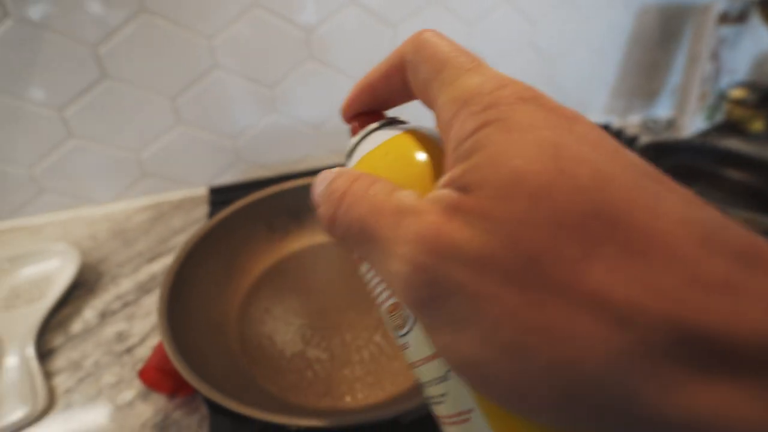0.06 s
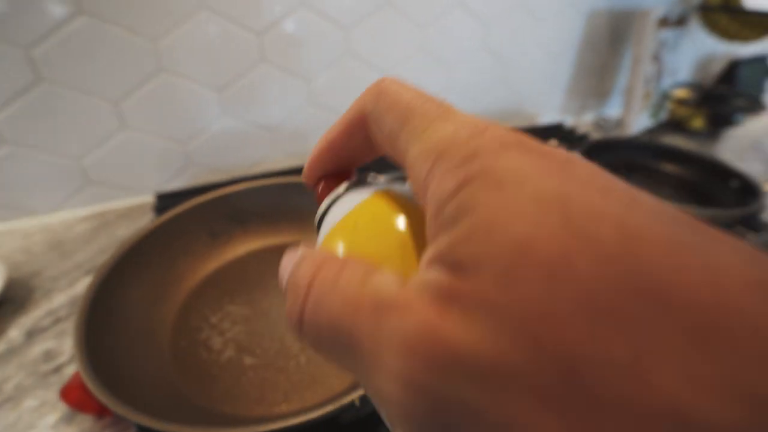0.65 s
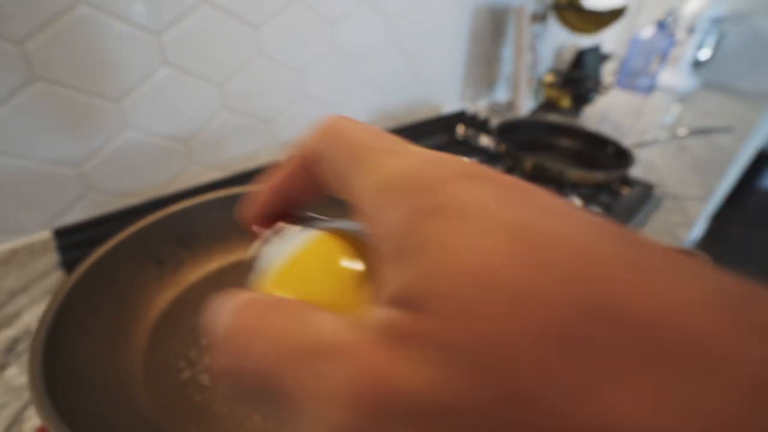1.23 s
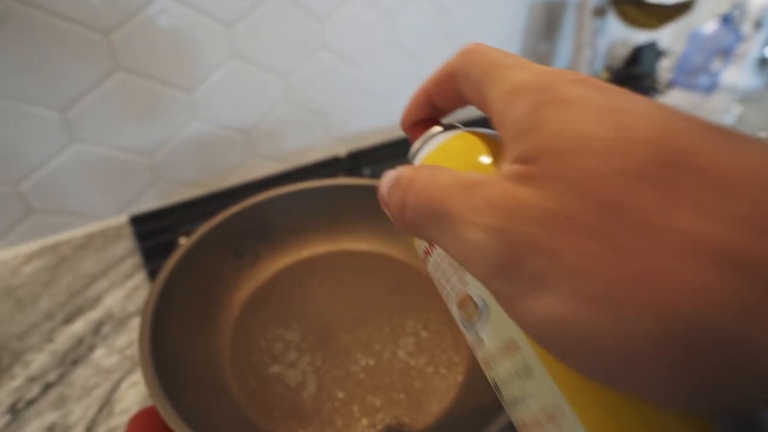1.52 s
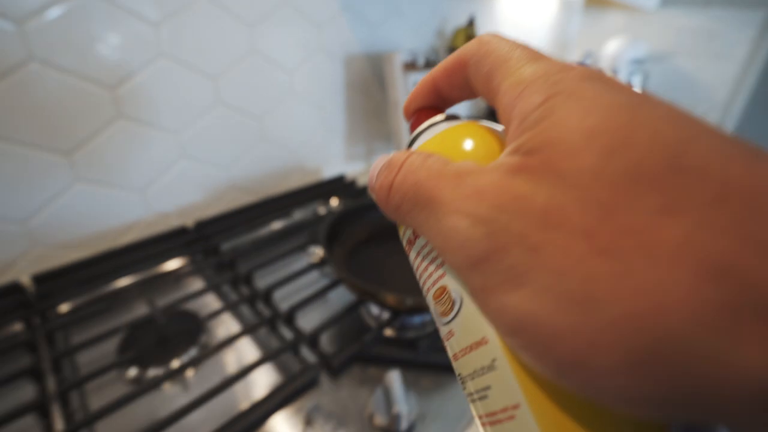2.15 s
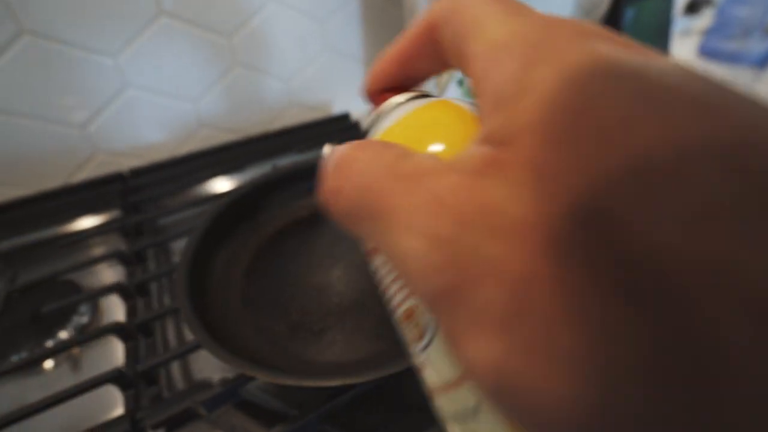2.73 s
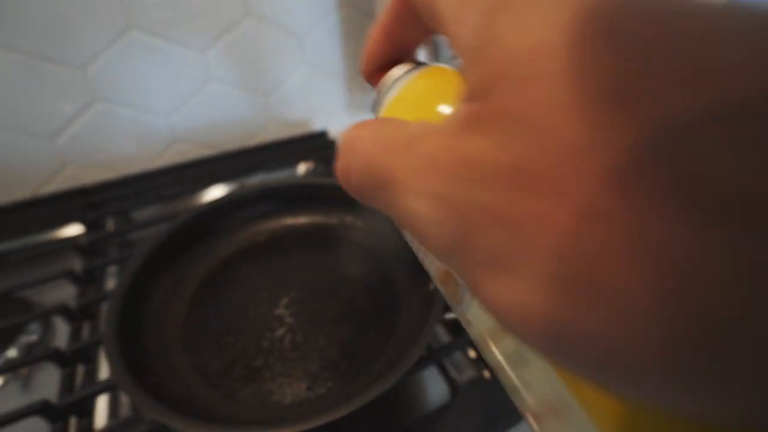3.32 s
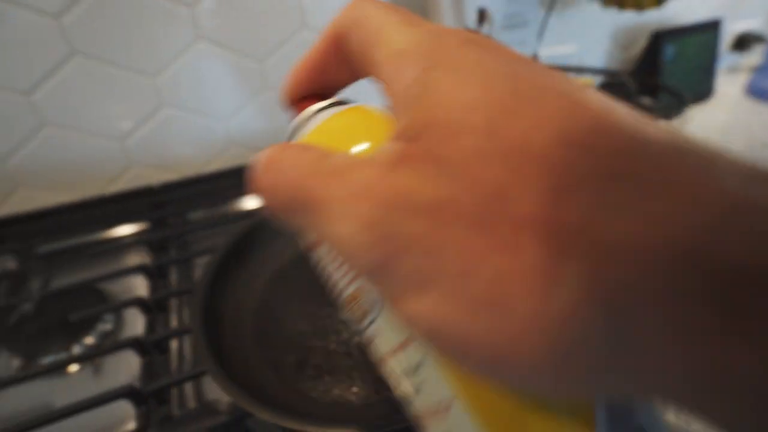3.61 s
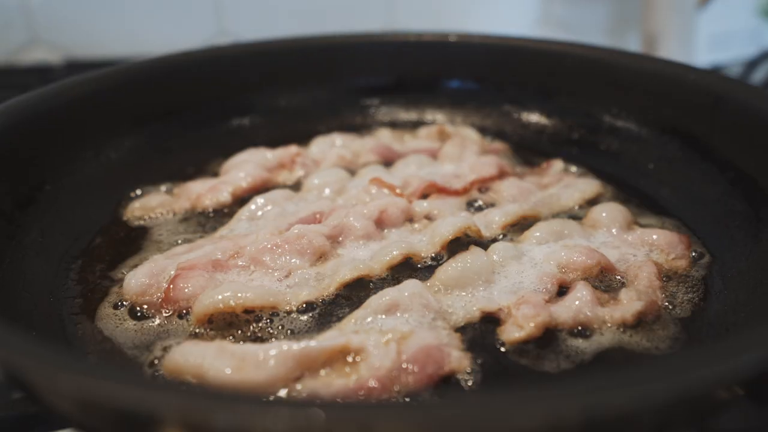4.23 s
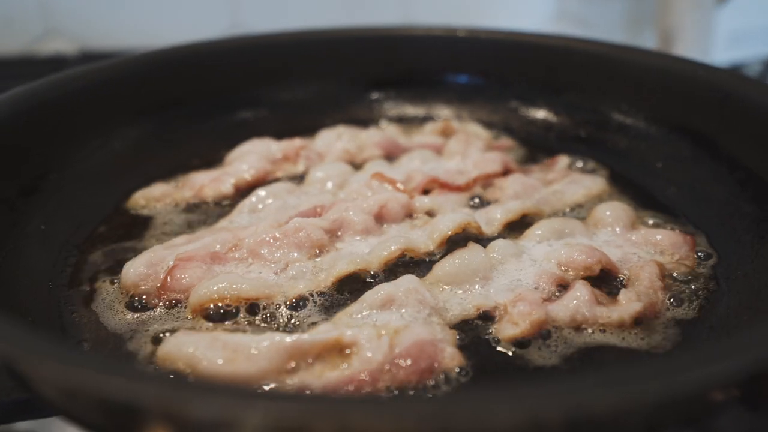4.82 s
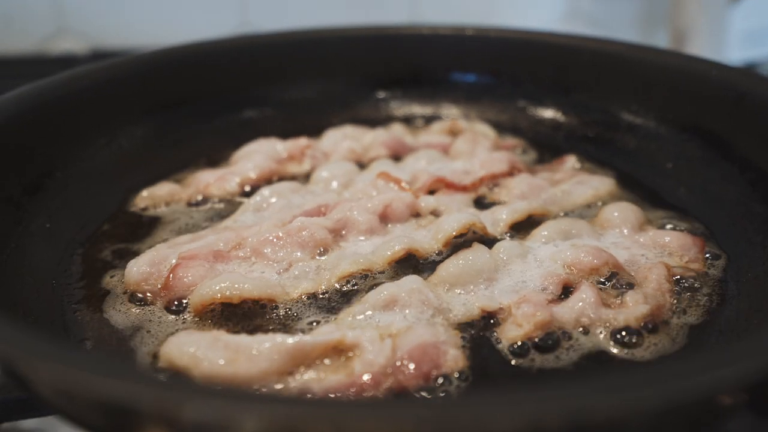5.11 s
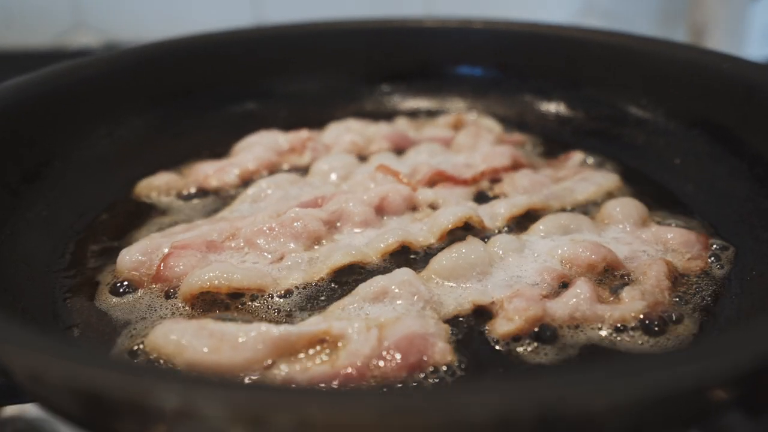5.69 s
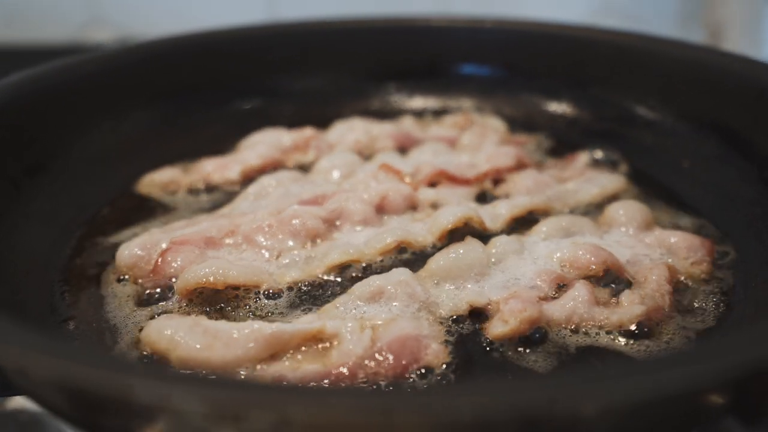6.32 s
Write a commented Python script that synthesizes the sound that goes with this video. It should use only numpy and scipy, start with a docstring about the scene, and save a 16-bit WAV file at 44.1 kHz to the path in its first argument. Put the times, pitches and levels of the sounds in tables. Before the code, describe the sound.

Two long hisses of aerosol cooking spray with a short pause between, followed abruptly by bacon crackling and spitting in hot fat.

```python
"""Cooking spray hisses into a frying pan on a gas stove, the nozzle whistling briefly; the circling can
shifts the pan's echoes. In the pause the burner hisses softly and the can ticks in the hand.
A second long burst follows, and a bump shakes the microphone mount. Then, abruptly, bacon fries
close up: dense bursting bubbles of fat, sharp pops, a few duller plops and spits of steam."""
import sys
import numpy as np
from scipy import signal
from scipy.fft import rfft, irfft, next_fast_len
from scipy.io import wavfile
from scipy.ndimage import map_coordinates

SR = 44100
rng = np.random.default_rng(int(sys.argv[2]) if len(sys.argv) > 2 else 0)


def inscribe(sig):
    """Save sig as 16-bit PCM at rate SR to the path in sys.argv[1].

    A 1-D sig is mono; a 2-D sig holds one channel per row.
    Samples are clipped to [-1, 1] before scaling.
    """
    pcm = np.round(np.clip(np.atleast_2d(sig).T, -1, 1) * 32767)
    wavfile.write(sys.argv[1], SR, pcm.astype(np.int16))


N = 280476
FRY_START_S = 4.06  # hard cut from spray to bacon
TOP_HZ = 15850


def spray():
    """The jet hisses while the valve is open and fizzles out after; the hand circles over the pan."""
    # nozzle presses: (opens [s], shuts [s], pan echo delay [ms], its swing [ms], hand circles [1/s]); the
    # second is still spraying when the scene changes at 4.06 s
    presses = [(-0.02, 1.473, 2.07, 0.057, 0.955), (2.446, 4.06, 1.89, 0.13, 1.75)]
    # tone of the jet, one spectrum a press: (frequency [Hz], density [dB])
    spectra = [
        [(35, -54), (60, -34.5), (87, -12), (206, -14), (299, -8.5), (588, -15.5), (834, -10.5), (1010, -16.5),
         (1210, -12), (2320, -14), (3620, -3), (5010, -11), (7990, -3), (12400, -0.5), (15700, -2.5)],
        [(35, -53), (60, -20), (142, -10.5), (243, -14.5), (306, -11), (661, -12), (725, -20), (854, -11),
         (2740, -13.5), (3000, -5.5), (3790, -3), (4790, -10.5), (8770, 0), (14000, 5.5), (15700, 2)],
    ]
    # hiss as the aim shifts, one curve a press: (time [s], body level [dB], top octave level [dB])
    levels = [
        [(0.02, -30.5, -27.5), (0.38, -32.5, -29.5), (0.504, -32.5, -26.5), (0.998, -32.5, -30.5),
         (1.102, -30.5, -30.5), (1.154, -33, -32), (1.21, -32, -27), (1.286, -32, -31.5), (1.46, -30.5, -30)],
        [(2.48, -31.5, -36), (2.544, -31, -31), (2.766, -30.5, -26.5), (2.948, -31.5, -29), (3.188, -30.5, -34),
         (3.604, -30, -29.5), (3.634, -32, -29), (3.93, -31, -26), (4.04, -31.5, -26.5)],
    ]
    open_s, shut_s, dribble_s = 0.013, 0.012, 0.17  # time constants
    first_flow, dribble_db = 0.22, -25  # against the full jet: as the seal parts, after shutting
    approach_ms_per_s = 0.14  # the echo comes sooner as the can nears the pan
    t, out = np.arange(N) / SR, np.zeros(N)
    for (opens, shuts, delay_ms, swing_ms, circle_hz), level, spectrum in zip(presses, levels, spectra):
        held, released = np.maximum(t - opens, 0), np.maximum(t - shuts, 0)
        opening = 1 - (1 - first_flow) * np.exp(-held / open_s)
        closing = np.maximum(np.exp(-released / shut_s), amp(dribble_db) * np.exp(-released / dribble_s))
        valve = opening * closing * (t > opens) * (t < FRY_START_S)
        body_db, top_db = curves(level)
        body, top = split(coloured(rng.standard_normal(N), spectrum), edge_hz=9880)
        sputter = amp(0.54 * wobble(45) + 0.66 * wobble(400))  # oil breaks up unevenly in the nozzle
        jet = valve * sputter * (amp(body_db) * unit(body) + amp(top_db - 0.24) * unit(top))
        beam = jet_lobes(jet, depth_db=1.0)
        circling_ms = swing_ms * np.cos(2 * np.pi * circle_hz * held)
        approach_ms = approach_ms_per_s * (t - (opens + shuts) / 2)
        out += pan_echoes(beam, delay_ms + circling_ms - approach_ms)
    return amp(-1.94) * out


def jet_lobes(jet, depth_db):
    """The jet's lobes sweep past as the can turns: broad bands swell and sink on their own."""
    bands = signal.stft(jet, nperseg=512)[2]
    patch = np.outer(np.hanning(8), np.hanning(40))
    swell = signal.fftconvolve(rng.standard_normal(bands.shape), patch, "same")
    return signal.istft(bands * amp(depth_db * unit(swell)), nperseg=512)[1][:N]


def pan_echoes(jet, delay_ms, far_count=5, far_gain=0.19, sway_ms=0.079):
    """Echoes comb the jet: near ones follow the pan, far ones drift as the hand sways."""
    # surfaces near the nozzle: (path [multiple of the pan's], reflection [gain])
    surfaces = [(.57, 0.09), (1.001, 0.26), (1.21, 0.31), (1.62, 0.24), (2.3, 0.11)]
    short_waves = split(jet, edge_hz=1860)[1]  # long waves bend round small things
    echo = lambda ms: map_coordinates(short_waves, [np.arange(N) - ms * SR / 1000])
    near = sum(gain * echo(path * delay_ms + 0.033 * wobble(3.96)) for path, gain in surfaces)
    far_ms = rng.uniform(2.5, 7, far_count)
    far = sum((-1) ** k * echo(ms + sway_ms * wobble(2.7)) for k, ms in enumerate(far_ms))
    return jet + near + far_gain * far


def sizzle(count=8500, spread_db=6.0, mean_cycles=1.8, fizz_db=-7.0):
    """Thousands of fat bubbles burst in clusters, over a fizz too fine to tell apart."""
    # tone of frying fat: (frequency [Hz], density [dB])
    fat = [(200, -36), (450, -19), (660, -22), (820, -8.5), (1030, -11.5), (1300, -5), (1750, -8.5),
           (2500, -10), (3700, -3.5), (4700, -5), (7300, -1), (8600, -1.5), (12600, -11.5), (15700, -17)]
    when, pitch, length = rng.random((count, 3)).T
    frying = np.arange(N) / SR > FRY_START_S
    activity = np.cumsum(amp(2.4 * wobble(130)) * frying)
    onsets = np.searchsorted(activity, when * activity[-1]) / SR
    hz = 600 + pitch ** 1.4 * (TOP_HZ - 600)  # the low octaves get their share of bubbles
    size = hz ** 0.94 * amp(spread_db * np.minimum(rng.standard_normal(count), 2.1))
    bursts = bubbles(onsets, size, hz, mean_cycles * (0.5 + length))
    crackle = coloured(bursts, fat) * np.sqrt(frying.mean())
    fizz = amp(fizz_db) * frying * coloured(rng.standard_normal(N), fat)
    surge = wobble(5)  # the boiling swells and sinks by chance
    dull, bright = split(crackle + fizz, edge_hz=5200)
    return amp(-25) * (amp(0.26 * surge) * bright + amp(0.73 * surge) * dull)


def pops():
    """Single bubbles snap out above the sizzle: a few loud ones among lesser ones at random."""
    # loudest bursting bubbles: (time [s], peak [dB], pitch [Hz])
    loudest = [(4.239, -4, 10700), (4.502, 0, 8400), (4.508, -6, 8100), (4.61, -2.5, 10000),
               (4.674, -1.5, 7300), (4.83, -1.5, 8600), (5.259, -2, 4540), (5.385, -3, 6700),
               (5.594, 1, 6960), (6.079, -2, 6700), (6.172, -2, 4700), (6.185, -1, 7100)]
    lesser = scattered(count=18, mean_db=-8, spread_db=0, centre_hz=8300, log_spread=0.25)
    onsets, db, hz = np.vstack([loudest, lesser]).T
    return bubbles(onsets, amp(db - 0.5), hz, cycles=1.6)


def bubbles(onsets, size, hz, cycles):
    """Each bursting bubble rings up and dies within a few cycles."""
    t = np.arange(160) / SR
    age = 2 * t * (hz / cycles)[:, None]
    rings = size[:, None] * age * np.exp(1 - age) * np.sin(2 * np.pi * hz[:, None] * t)
    at = (onsets * SR).astype(int)[:, None] + np.arange(len(t))
    return np.bincount(at.ravel(), rings.ravel(), N)[:N]


def spits(crack_t60=0.014, thud_t60=0.024):
    """A water pocket flashes to steam: a bright crack over a soft thud."""
    # spits of fat: (time [s], crack level [dB], thud level [dB])
    hits = [(4.414, -20, -30), (5.148, -17, -27.5), (5.2434, -5.5, -29.5), (5.727, -14, -60),
            (5.847, -8.5, -60), (6.184, -15.5, -36), (6.242, -24, -60)]
    # tone of the crack: (frequency [Hz], density [dB])
    crack_tone = [(600, -19), (1300, 7), (3000, -15), (7000, -19), (12000, 8), (16000, 6)]
    # tone of the steam's thud: (frequency [Hz], density [dB])
    thud_tone = [(40, -23), (130, 0.5), (350, -6), (700, -2), (2000, -22), (8000, -60)]
    out, t = np.zeros(N), np.arange(SR // 8) / SR
    attack = 1 - np.exp(-t / 0.001)
    for onset, crack_db, thud_db in hits:
        crack = amp(crack_db - 60 * t / crack_t60) * coloured(rng.standard_normal(len(t)), crack_tone)
        thud = amp(thud_db - 60 * t / thud_t60) * coloured(rng.standard_normal(len(t)), thud_tone)
        add(out, onset, (crack + thud) * attack)
    return out


def plops(centre_hz=2300, db_per_octave=4):
    """Larger bubbles burst with a short ring; the higher ones are sharper and louder."""
    # foreground plops: (time [s], level [dB], pitch [Hz])
    loudest = [(4.062, -19, 4160), (4.335, -16, 5500), (4.467, -23, 970), (5.135, -24, 1840),
               (5.245, -24, 2300), (5.452, -19.5, 3850), (5.666, -23.5, 1160), (5.692, -20, 3600),
               (5.948, -18, 5000)]
    chance = scattered(count=13, mean_db=-28.5, spread_db=2, centre_hz=centre_hz, log_spread=0.95)
    lesser = [(onset, db + db_per_octave * np.log2(hz / centre_hz), hz) for onset, db, hz in chance]
    return puffs(list(loudest) + lesser, breadth=0.47, t60=0.042)


def mount_bumps():
    """The sprung microphone mount knocks and sways."""
    # modes set off by bumps: (time [s], level [dB], pitch [Hz], t60 [s])
    bumps = [(2.122, -47, 52, .2), (2.327, -47, 85, 0.063), (3.473, -23.5, 157, 0.038),
             (3.477, -28.5, 30, 0.28), (3.497, -25, 166, 0.048), (3.514, -28.5, 28.4, 0.75)]
    out, t = np.zeros(N), np.arange(SR) / SR
    for onset, db, hz, t60 in bumps:
        add(out, onset, amp(db - 60 * t / t60) * np.sin(2 * np.pi * hz * t))
    return out


def whistle(peak_s=0.7, fade_s=0.13, level_db=-49, pitch_hz=2195, rise_hz_per_s=410):
    """The nozzle briefly sings a thin, unsteady note that rises as it swells and fades."""
    t = np.arange(N) / SR - peak_s
    hz = pitch_hz + rise_hz_per_s * t + 25 * wobble(124)
    envelope = amp(level_db + 3 * wobble(41)) * np.exp(-(t / fade_s) ** 2)
    return envelope * np.sin(2 * np.pi * np.cumsum(hz) / SR)


def can_ticks():
    """The can ticks as it shifts in the hand."""
    # handling ticks: (time [s], level [dB], pitch [Hz])
    ticks = [(1.622, -53, 13000), (1.66, -48, 11500), (1.681, -46, 9500), (1.697, -50, 3700),
             (1.823, -53, 3100), (1.844, -45, 3500), (1.848, -50, 5600), (1.935, -57, 14500),
             (1.948, -58, 1900), (1.997, -52, 10200)]
    return puffs(ticks, breadth=0.33, t60=0.055)


def burner():
    """Gas sings in the burner's ports over the low rush of the flame, a quiet bed throughout."""
    # burner levels: (time [s], gas hiss [dB], flame [dB])
    levels = [(1.55, -55.5, -54.5), (2.004, -57, -58.5), (2.162, -59.5, -57.5), (2.42, -57.5, -55)]
    # port resonances: (centre [Hz], width [Hz], gain [dB])
    modes = [(1247, 62, -3), (1700, 170, -7), (3620, 190, 1), (4520, 130, -5.5), (5830, 270, 1),
             (7040, 170, -4), (7600, 140, -8), (8940, 190, -3), (9830, 150, 0.5), (10700, 350, -17)]
    # tone of flame and kitchen: (frequency [Hz], density [dB])
    flame_tone = [(25, -14), (60, 0.5), (180, 0), (260, -6.5), (400, -4), (620, -10.5), (900, -17),
                  (2500, -23.5), (8000, -19.5), (12000, -23), (15500, -30)]
    hiss_db, flame_db = curves(levels)
    ports = lambda f: sum((-1) ** k * amp(db) * resonance(f, hz, width)
                          for k, (hz, width, db) in enumerate(modes))
    hiss = amp(hiss_db - 2) * unit(filtered(rng.standard_normal(N), ports))
    return hiss + amp(flame_db) * coloured(rng.standard_normal(N), flame_tone)


def kitchen(send):
    """The tiled room's short tail, duller as it dies."""
    # room decay: (frequency [Hz], t60 [s])
    decay = [(200, 0.52), (2000, 0.26), (12000, 0.065)]
    hz, t, bands = signal.stft(rng.standard_normal(SR // 2), SR, nperseg=256)
    tail = signal.istft(bands * amp(-60 * t / along(decay, hz)[:, None]), SR, nperseg=256)[1]
    predelayed = np.pad(send, (150, 0))
    return signal.fftconvolve(predelayed, tail / np.linalg.norm(tail))[:N]


def puffs(rows, breadth, t60):
    """Short dying bursts of noise, each in its own resonance, breadth times its pitch wide."""
    out, t = np.zeros(N), np.arange(SR // 8) / SR
    attack = 1 - np.exp(-t / 0.0007)
    for onset, db, hz in rows:
        ring = unit(filtered(rng.standard_normal(len(t)), lambda f: resonance(f, hz, breadth * hz) ** 2))
        add(out, onset, amp(db - 60 * t / t60) * ring * attack)
    return out


def scattered(count, mean_db, spread_db, centre_hz, log_spread):
    """Chance events spread over the frying: (time [s], level [dB], pitch [Hz])."""
    share = (np.arange(count) + rng.random(count)) / count
    onsets = FRY_START_S + share * (N / SR - FRY_START_S)
    soft, high = rng.standard_normal((count, 2)).T
    return np.column_stack([onsets, mean_db - spread_db * soft, centre_hz * np.exp(log_spread * high)])


def amp(db):
    return 10 ** (np.asarray(db) / 20)


def unit(x):
    """x at rms 1."""
    return x / np.sqrt(np.mean(x ** 2) + 1e-20)


def along(points, hz):
    """Interpolate (Hz, value) points on a log axis."""
    knots_hz, values = np.transpose(points)
    return np.interp(np.log(hz + 1), np.log(knots_hz + 1), values)


def curves(rows):
    """One value per sample for each column after the time."""
    times, *columns = np.transpose(rows)
    return [np.interp(np.arange(N) / SR, times, column) for column in columns]


def wobble(rate):
    """A smooth random curve, rate knots a second."""
    return map_coordinates(rng.standard_normal(int(N * rate / SR) + 4), [np.arange(N) * rate / SR])


def filtered(x, response):
    """x through a complex frequency response."""
    size = next_fast_len(len(x) + 8192)
    return irfft(rfft(x, size) * response(np.fft.rfftfreq(size, 1 / SR)), size)[:len(x)]


def coloured(x, spectrum):
    """x through a (Hz, dB) spectrum, at rms 1."""
    return unit(filtered(x, lambda hz: amp(along(spectrum, hz))))


def resonance(f, centre, width):
    """Response of one damped mode."""
    return 1j * f * width / (centre ** 2 - f ** 2 + 1j * f * width)


def split(x, edge_hz):
    """The parts of x below and above a soft crossover."""
    low = filtered(x, lambda hz: 1 / (1 + (hz / edge_hz) ** 8))
    return low, x - low


def add(track, onset_s, sound):
    """Mix a sound into the track."""
    part = track[round(onset_s * SR):][:len(sound)]
    part += sound[:len(part)]


def scene():
    """All sources reach one microphone, alike in both channels."""
    can = spray() + whistle() + can_ticks()
    bacon = pops() + plops() + sizzle() + spits()
    room = kitchen(amp(-16) * can + amp(-15) * bacon)
    return np.tile(can + bacon + room + burner() + mount_bumps(), (2, 1))


def record(dry):
    """A brick-wall low-pass takes off the very top."""
    return np.array([filtered(side, lambda hz: hz < TOP_HZ) for side in dry])


dry = scene()
out = record(dry)
inscribe(out)
```